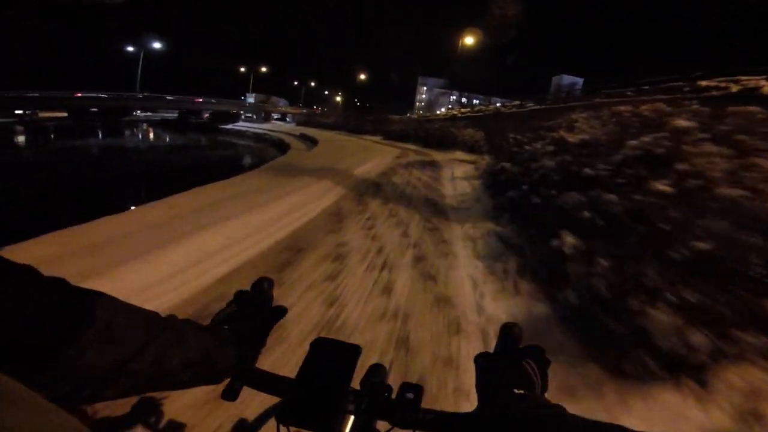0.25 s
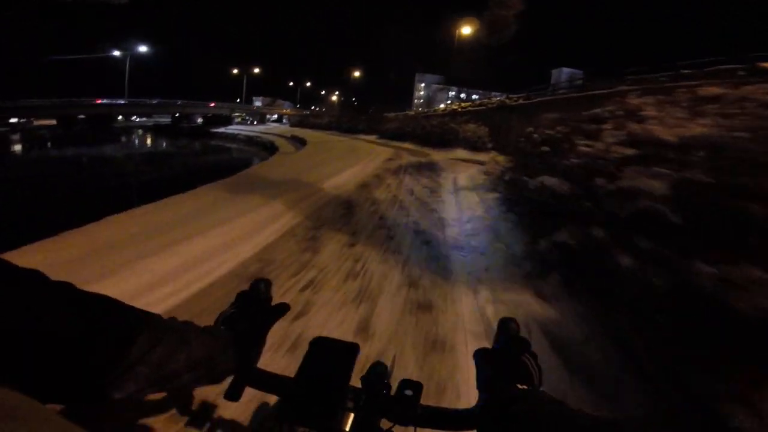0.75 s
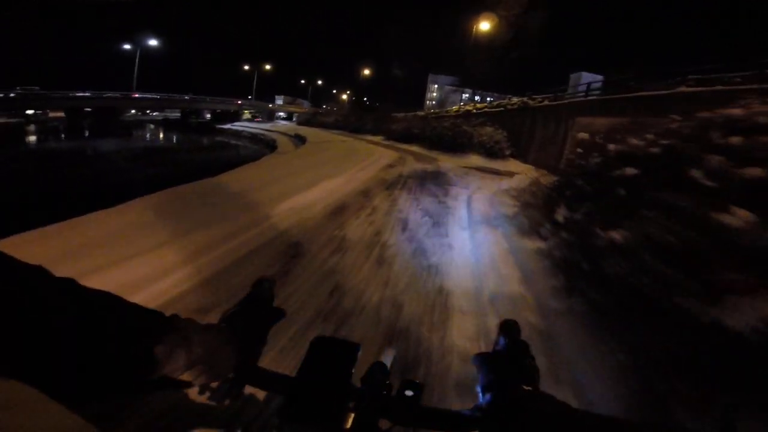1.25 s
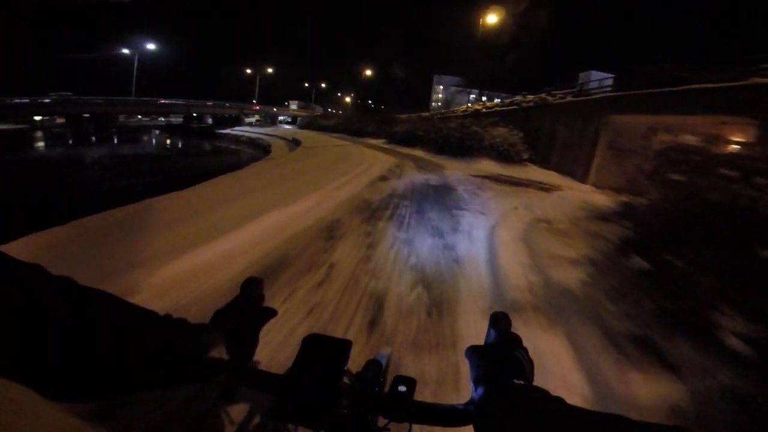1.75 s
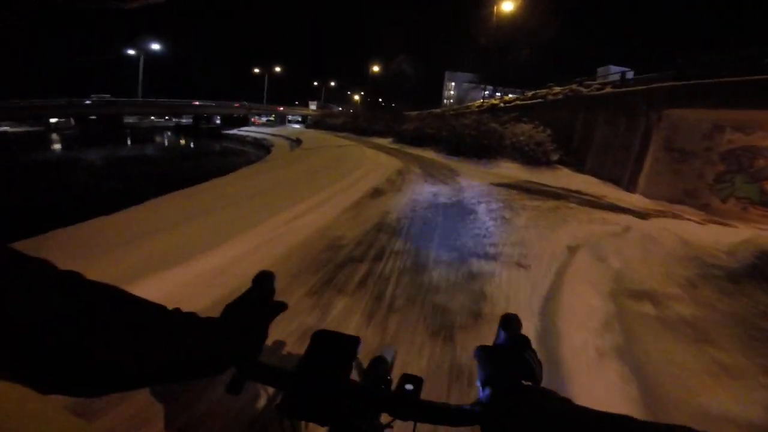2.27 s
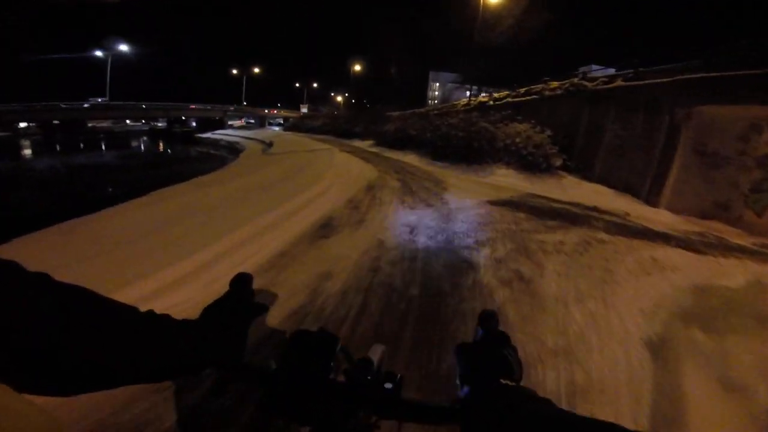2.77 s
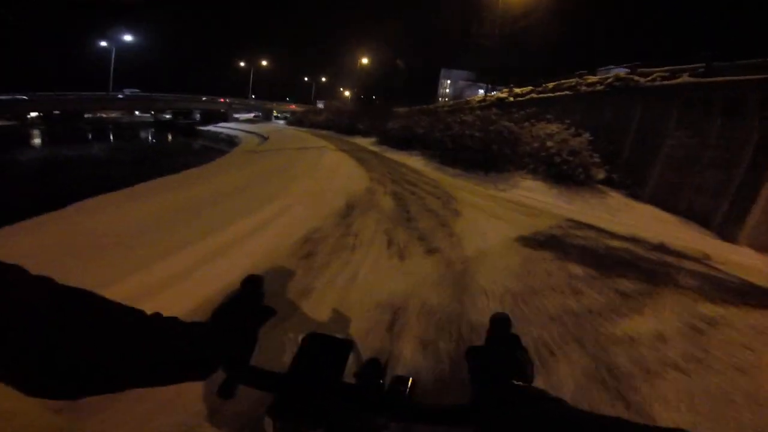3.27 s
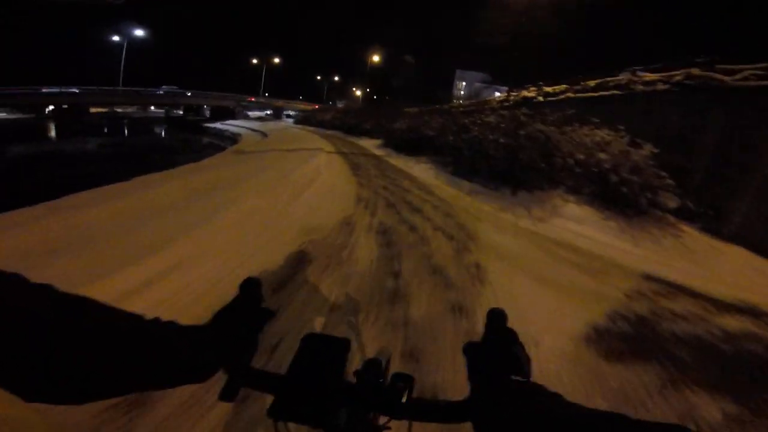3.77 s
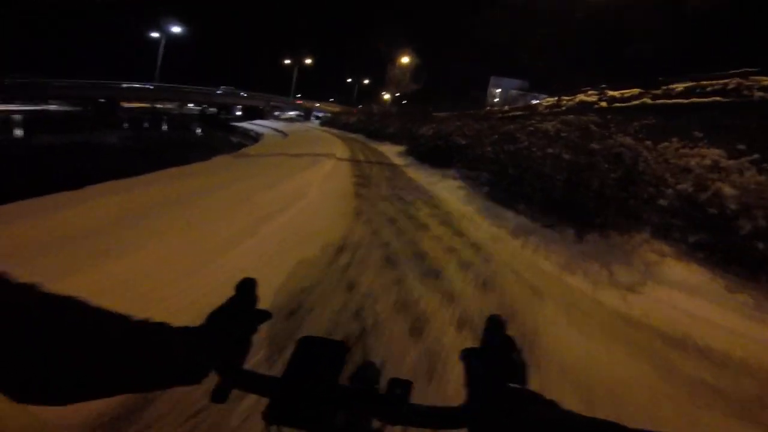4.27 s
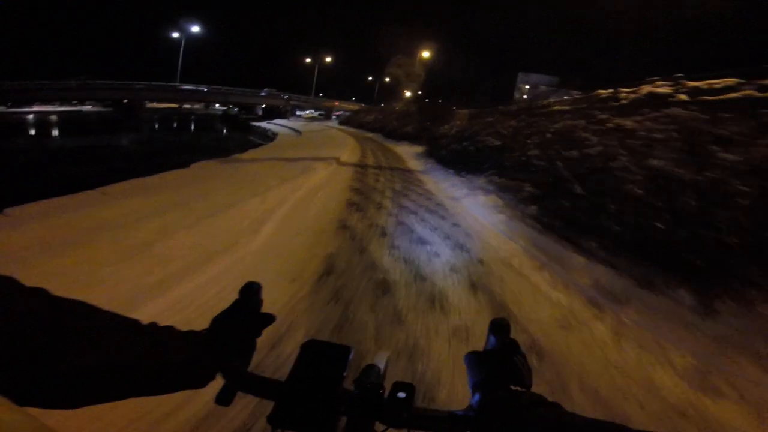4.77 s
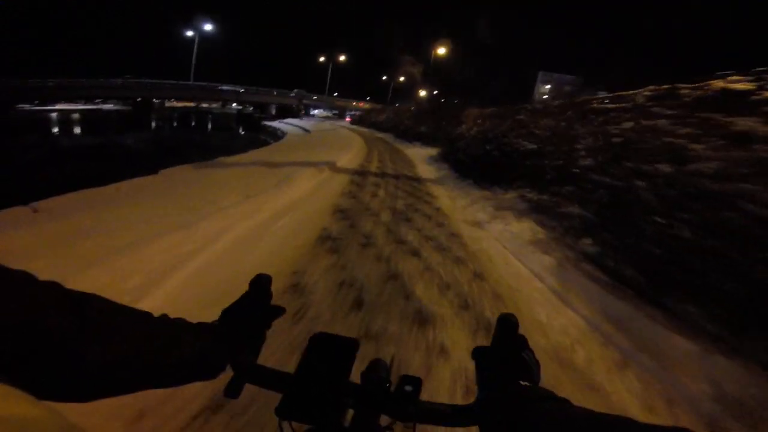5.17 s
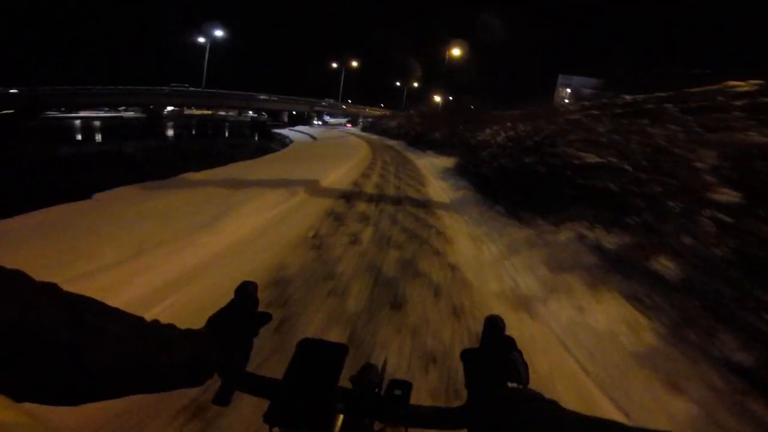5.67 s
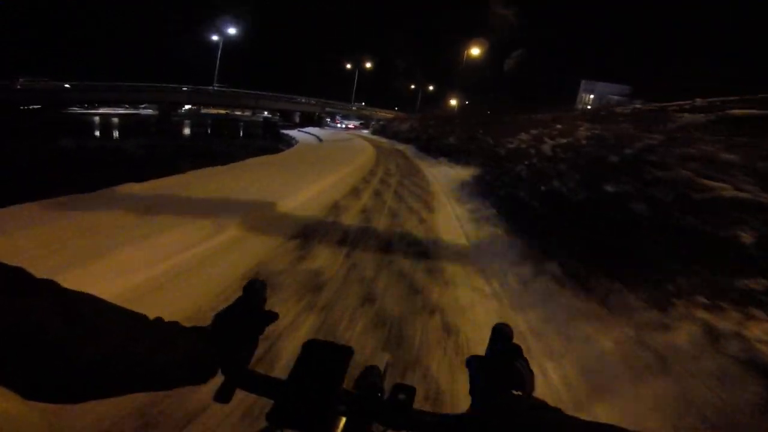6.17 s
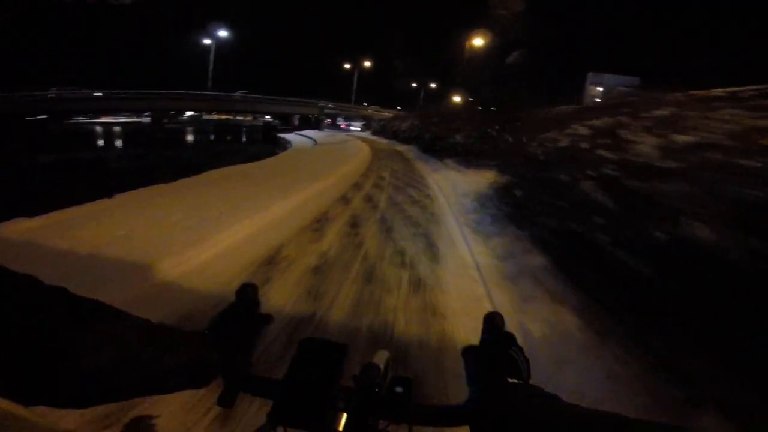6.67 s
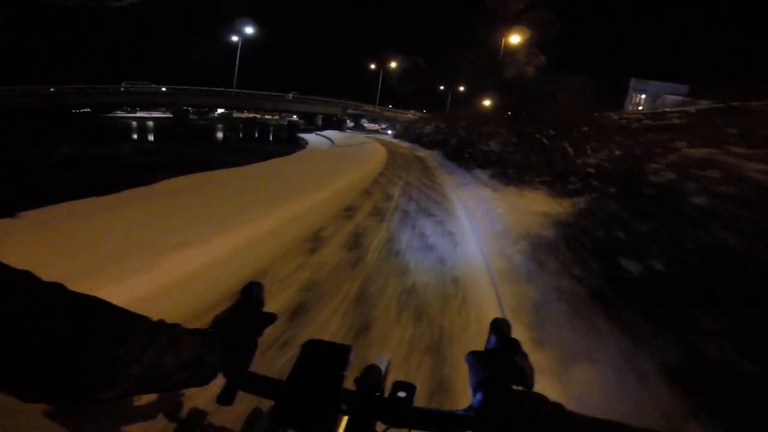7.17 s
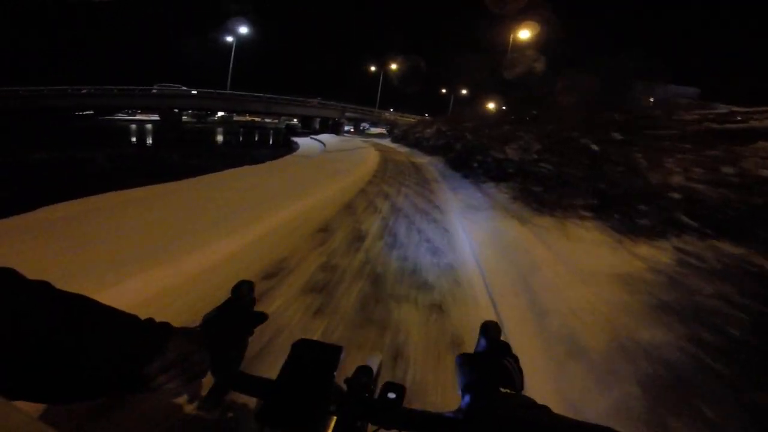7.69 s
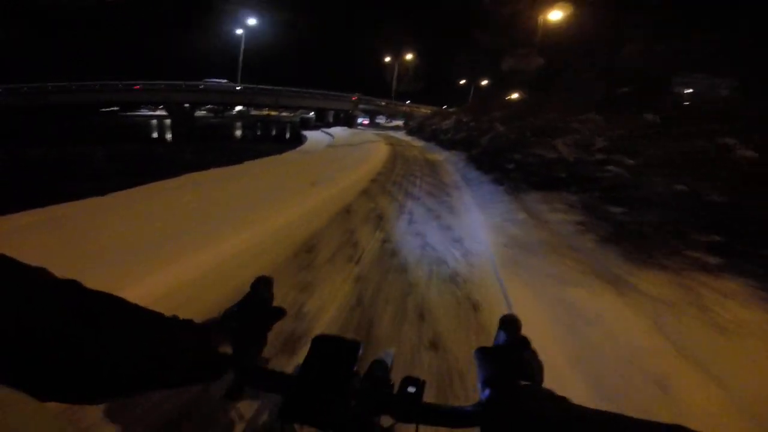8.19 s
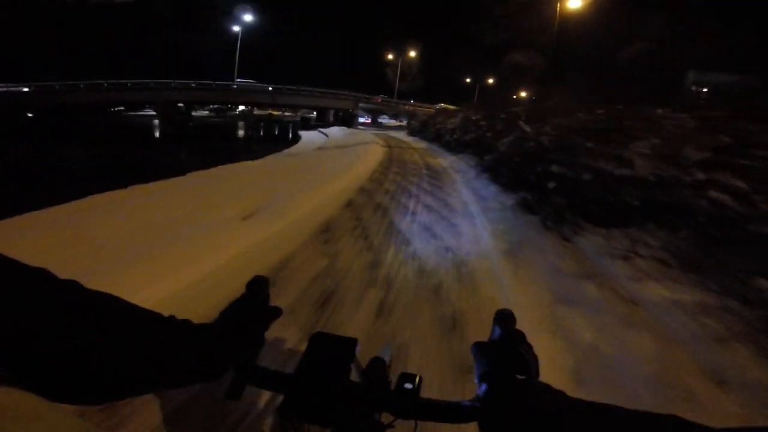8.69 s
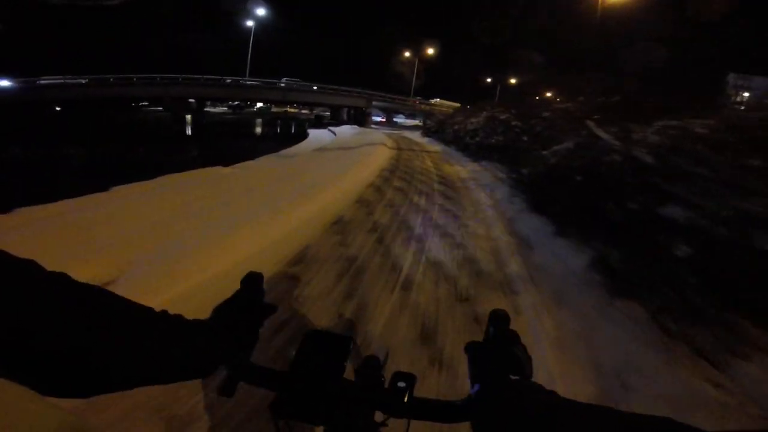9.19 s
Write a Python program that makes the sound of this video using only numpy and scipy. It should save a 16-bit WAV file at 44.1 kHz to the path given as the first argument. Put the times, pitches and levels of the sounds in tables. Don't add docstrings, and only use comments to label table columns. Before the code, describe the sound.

For about nine and a half seconds a bicycle rides without pause over packed snow in the open air, heard very close through a small, hard-cased camera. Deep wind rumble leads, heaving and fluttering irregularly. Underneath runs a softer, dry, grainy tyre hiss with fine crystalline prickle. Early on there are light gusts, ice ticks near 0.1 and 1.0, and crunches around 0.9 and 1.5. Bumps and knocks gather from 1.9 to 2.9, then the heaviest gust hits at 3.0-3.3, briefly overloading the microphone. Another sharp push comes near 4.35. Bright ice snaps stand out around 5.3, with a firm low thud at 5.5. The grind strengthens near 6.8; gusts cluster at 7.6-8.5, with thuds and a ringing rasp near 8.45. Snaps and rolling continue to the end, crisp but slightly holed in the treble.

```python
import sys
import numpy as np
from scipy import signal
from scipy.fft import rfft, irfft, next_fast_len
from scipy.io import wavfile
from scipy.ndimage import uniform_filter1d

SR = 44100
rng = np.random.default_rng(int(sys.argv[2]) if len(sys.argv) > 2 else 0)


def gain_from_decibels(decibels):
    exponent = np.asarray(decibels, float) / 20
    return 10 ** exponent


def pcm_store(signal):
    levels = np.round(np.clip(np.atleast_2d(signal), -1, 1) * 32767)
    wavfile.write(sys.argv[1], SR, levels.astype(np.int16).T)


N = 416304
T = np.arange(N) / SR

# time in seconds, load on the crust in dB, loose powder thrown up in dB over the load.
TYRES = [(0.0, -58, 1), (0.5, -61.5, -2), (1.05, -58.5, -2.5), (1.4, -60.5, -3.5), (1.85, -58.5, -1),
         (2.26, -60.5, -10.5), (2.75, -57.5, -1), (3.4, -59, -4.5), (3.73, -58.5, -9), (4.05, -59, 3.5),
         (5.0, -56.5, -3.5), (5.5, -59, -0.5), (6.07, -58.5, 4), (6.85, -55, -2), (7.44, -59, 1),
         (8.25, -55.5, -1.5), (8.9, -58.5, -6.5), (9.44, -58, 0.5)]
# pitch in Hz, width in Hz, height in dB.
CASE = [(1897, 62, 2), (2528, 50, 5), (2900, 370, 1.5), (3500, 42, 4), (4137, 140, 6.5), (4590, 70, 3.5)]


def evened(x):
    return x / np.sqrt(np.mean(x ** 2) + 1e-20)


def curve(rows, order):
    rows = np.array(rows)
    return np.interp(T, rows[:, 0], rows[:, order])


def colour(x, points, modes=()):
    size = next_fast_len(N)
    hz = np.fft.rfftfreq(size, 1 / SR)
    point_hz, point_db = np.transpose(points)
    shape_db = np.interp(np.log(hz + .1), np.log(point_hz), point_db, right=-160)
    for centre, width, height_db in modes:
        shape_db = shape_db + height_db / (1 + (2 * (hz - centre) / width) ** 2)
    return evened(irfft(rfft(x, size) * gain_from_decibels(shape_db), size)[:N])


def drift(per_s):
    return evened(signal.lfilter(*signal.butter(2, per_s, fs=SR), rng.standard_normal(N)))


def grains(per_s, spread_db):
    size = gain_from_decibels(spread_db * np.minimum(rng.exponential(1, N), 5))
    sign = np.sign(rng.standard_normal(N))
    return evened(size * sign * (rng.random(N) < per_s / SR))


def swells(rows, narrow=4.2):
    out = np.zeros(N)
    for s, db, length in rows:
        near = slice(max(round((s - 2 * length) * SR), 0), round((s + 2 * length) * SR))
        out[near] += gain_from_decibels(db) ** 2 * np.exp(-((T[near] - s) * narrow / length) ** 2)
    return np.sqrt(out)


def steadied(x, size, power):
    swing = abs(uniform_filter1d(uniform_filter1d(x ** 2, size), size)) + 0.037
    return evened(x / swing ** (power / 2))


def patchy(x, depth_db):
    z = signal.stft(x, SR, nperseg=512, noverlap=384)[2]
    field = rng.standard_normal(z.shape[::-1]).T
    field = uniform_filter1d(uniform_filter1d(field, size=6, axis=0), size=30, axis=1)
    z = z * gain_from_decibels(depth_db * evened(field))
    return evened(signal.istft(z, SR, nperseg=512, noverlap=384)[1][:N])


def rings(rows, spread, fall, blur_s):
    out = np.zeros(N)
    chances = rng.uniform(-0.68, 1, (len(rows), 5))
    for (s, db, length, hz), chance in zip(rows, chances):
        tau = max(length - blur_s, .002) / fall
        u = np.arange(round(8 * tau * SR)) / SR / tau
        tone = np.zeros(len(u))
        for place, phase in zip(np.linspace(-1, 1, len(chance)), chance):
            partial_hz = hz * (1 + spread * place)
            tone += gain_from_decibels(-3.5 * abs(place)) * np.sin(2 * np.pi * partial_hz * u * tau + np.pi * phase)
        envelope = np.sqrt(u) * np.exp(1 - u)
        part = out[max(round((s - 1.1 * tau) * SR), 0):][:len(u)]
        part += (gain_from_decibels(db) * evened(tone) * envelope)[:len(part)]
    return out


def wind():
    # time in seconds, airflow over the case in dB, roughness of the air in dB.
    air = [(0.0, -24, -2), (0.6, -25, -1), (1.3, -22, 0), (1.9, -22.5, -2), (2.3, -16.5, -0.5),
           (3.0, -27.5, 0), (3.6, -20, -0.5), (4.2, -25, 0), (4.7, -24, -0.5), (5.1, -20.5, 0),
           (5.7, -23, -1.5), (6.4, -21, -0.5), (7.0, -22.5, -1), (7.8, -24, -2), (8.4, -18.5, -0.5),
           (8.9, -20, -2.5), (9.44, -31.5, -3.5)]
    # time in seconds, level in dB, length in seconds.
    gusts = [(0.08, -15, 0.082), (0.21, -16.5, 0.16), (0.8, -15.5, 0.25), (1.09, -13.5, 0.12),
             (2.11, -16.5, 0.18), (2.38, -18.5, 0.43), (2.7, -15.5, 0.1), (2.815, -13.5, 0.11),
             (2.98, -10, 0.23), (3.11, -15, 0.6), (3.29, -5, 0.11), (3.42, -21, .06), (3.72, -12.5, 0.29),
             (3.89, -15, 0.16), (4.1, -11.5, 0.23), (4.35, -7.5, 0.03), (4.58, -15.5, 0.17),
             (5.26, -29, 0.23), (6.01, -15, 0.35), (6.73, -18.5, 0.079), (6.98, -15, 0.083),
             (7.23, -15.5, .12), (7.41, -16.5, 0.12), (7.57, -10.5, 0.083), (7.73, -19, 0.17),
             (8.02, -9.5, 0.2), (8.13, -12, 0.12), (8.26, -10.5, 0.15), (8.49, -7.5, 0.069),
             (9.3, -15, 0.3)]
    # time in seconds, level in dB.
    flaps = [(0.21, -30.5), (0.47, -40), (0.68, -39), (0.97, -30), (1.1, -28), (1.22, -35.5), (1.44, -35.5),
             (1.68, -34.5), (1.98, -34), (2.3, -42), (2.42, -38), (2.53, -38), (2.65, -30.5), (2.88, -37.5),
             (3.0, -28), (3.12, -39), (3.29, -35), (3.6, -33.5), (3.73, -31.5), (3.96, -33), (4.09, -27.5),
             (4.21, -37.5), (4.33, -29), (4.57, -35), (4.8, -42), (4.92, -40), (5.16, -35), (5.4, -38.5),
             (5.64, -32), (5.76, -34), (5.89, -32.5), (6.13, -30.5), (6.25, -38.5), (6.37, -34), (6.5, -36),
             (6.84, -36), (6.95, -30), (7.08, -31), (7.22, -35), (7.34, -34.5), (7.46, -36.5),
             (7.57, -30.5), (7.69, -28), (7.81, -34.5), (8.03, -31), (8.16, -38), (8.28, -30), (8.41, -37),
             (8.88, -38), (9.0, -31), (9.12, -30), (9.24, -26.5), (9.37, -33.5)]
    # pitch in Hz, level in dB.
    heave_hz_db = [(2, -20), (5, -5.5), (8, -1.5), (14, 0), (24, -3), (35, -10.5), (45, -15), (56, -25.5),
                   (75, -47)]
    # pitch in Hz, level in dB.
    flutter_hz_db = [(30, -16), (39, 9), (50, 9), (62, 0.5), (75, -10), (100, -23), (140, -50),
                     (260, -79.5)]
    # pitch in Hz, level in dB.
    roar_hz_db = [(55, -2), (75, 1.5), (105, -1), (200, -8.5), (330, -15), (700, -22), (1150, -26),
                  (1450, -34.5), (2500, -54.5), (6000, -49.5)]
    usual = gain_from_decibels(-20)

    heave = steadied(colour(rng.standard_normal(N), heave_hz_db), size=2400, power=.75)
    flutter = steadied(colour(rng.standard_normal(N), flutter_hz_db), size=1300, power=.95)
    lumps_db = 1.25 * drift(24) + 0.5 * drift(35) + 0.91 * abs(heave)
    roar = colour(rng.standard_normal(N) * gain_from_decibels(lumps_db), roar_hz_db)

    flow = gain_from_decibels(curve(air, order=1))
    push = np.hypot(flow, swells(gusts))
    steady = gain_from_decibels(-39.5) * (flow / usual) ** 0.38
    flap = np.hypot(steady, swells([(s, db, 0.2) for s, db in flaps]))
    roar_gain = gain_from_decibels(-47 + curve(air, order=2)) * (push / usual) ** 0.28

    slow = signal.sosfiltfilt(signal.butter(5, 43, fs=SR, output="sos"), push * heave)
    return slow + gain_from_decibels(2.7) * flap * flutter + roar_gain * roar


def tyres():
    # pitch in Hz, level in dB.
    grind_hz_db = [(900, -3), (1400, -1), (1750, 6.5), (3500, 2.5), (3900, -1), (5500, -4.5), (6550, -9.5),
                   (8900, -11.5), (10400, -23), (14600, -33), (16000, -31.5)]
    # pitch in Hz, level in dB.
    spray_hz_db = [(2500, -5), (3700, -0.5), (4100, 4.5), (4700, 8), (5200, 3), (5500, -8), (6100, -2.5),
                   (6600, -29.5), (9000, -49.5)]
    # time in seconds, length in seconds, level in dB, sharpness in dB.
    crunches = [(0.54, 0.14, -61, -8), (0.859, 0.1, -54.5, -9), (1.272, 0.031, -63, -8),
                (1.467, 0.031, -59, -7), (1.652, 0.039, -58, -21), (1.75, 0.11, -65.5, -5),
                (2.474, 0.031, -54, -9), (2.878, 0.13, -57, -7), (2.975, 0.069, -54.5, -8),
                (3.08, 0.054, -56, -9), (3.191, 0.027, -64, -1), (3.25, 0.031, -66, 1),
                (3.735, 0.078, -55, -6), (3.898, 0.075, -55.5, -8), (4.284, 0.047, -55.5, -21),
                (4.53, 0.024, -56.5, -11), (4.606, 0.017, -53.5, -22), (5.205, 0.078, -58, -4.5),
                (5.302, 0.02, -54.5, -14), (5.54, 0.037, -57, -19), (5.763, 0.14, -57.5, -15),
                (5.937, 0.093, -58.5, -12), (6.017, 0.045, -56, -8), (6.25, 0.058, -62.5, -1),
                (6.755, 0.09, -52, -10.5), (7.836, 0.11, -58.5, -13), (8.246, 0.11, -59, -11),
                (8.371, 0.046, -54, -10), (8.53, 0.22, -57, -16), (8.876, 0.12, -60, -20)]
    # time in seconds, length in seconds, level in dB.
    crackles = [(0.081, 0.025, -55), (1.53, 0.037, -58), (2.86, 0.1, -55.5), (4.096, 0.03, -55.5),
                (4.328, 0.016, -53), (5.287, 0.022, -60), (7.478, 0.049, -58), (7.584, 0.048, -59),
                (7.837, 0.21, -61.5), (8.194, 0.025, -59), (8.252, 0.11, -65), (8.878, 0.18, -68)]

    crust_db = 0.46 * drift(21) + 0.98 * drift(90)
    pressed = grains(9000, spread_db=0.0) * gain_from_decibels(crust_db + 1.8 * drift(28))
    grind = patchy(colour(pressed, grind_hz_db, CASE), depth_db=1.13)
    thrown = grains(7000, spread_db=4.0) * gain_from_decibels(1.4 * crust_db + 1.7 * drift(32))
    spray = colour(thrown, spray_hz_db, CASE)
    load, powder = gain_from_decibels(curve(TYRES, order=1)), gain_from_decibels(curve(TYRES, order=2) - 2.5)
    rolling = load * (gain_from_decibels(-1.03) * grind + powder * spray)

    coarse = grains(3000, spread_db=2.5)
    crunch = colour(coarse, [(1000, -18), (1600, 7.5), (3300, 9.5), (4200, -12.5), (7000, -30.0)], CASE)
    crackle = colour(coarse, [(2500, -36.5), (3600, 1.5), (4700, 1.0), (5600, -7.5), (7000, -28.5)], CASE)
    fizz = colour(coarse, [(4500, -1.5), (6000, 2), (9000, -4), (10500, -6.5), (16000, -22.5)])
    breaks = swells([(s, db, length) for s, length, db, _ in crunches])
    sharp = swells([(s, db + sharp_db, length) for s, length, db, sharp_db in crunches])
    alone = swells([(s, db, length) for s, length, db in crackles])
    glaze = np.hypot(gain_from_decibels(-6) * breaks, alone)
    return rolling + gain_from_decibels(0.8) * (breaks * crunch + glaze * crackle + sharp * fizz)


def prickle():
    out = np.zeros(N)
    for hz, _, _ in CASE:
        out += signal.lfilter(*signal.iirpeak(hz, hz / 450, fs=SR), grains(45, spread_db=2.5))
    return gain_from_decibels(curve(TYRES, order=1) - 11.5) * evened(out)


def thuds():
    # time in seconds, level in dB, length in seconds, pitch in Hz.
    ruts = [(0.048, -41, 0.02, 110), (0.764, -48, 0.055, 164), (1.936, -36.5, 0.012, 132),
            (2.177, -43, 0.032, 164), (2.398, -39.5, 0.045, 140), (2.436, -45, 0.04, 123),
            (2.802, -40, 0.034, 139), (2.915, -38, 0.012, 166), (3.933, -42.5, 0.023, 170),
            (4.182, -40, 0.045, 148.5), (4.275, -49.5, 0.047, 256.5), (4.581, -54, 0.077, 137.5),
            (4.922, -42, 0.038, 248), (5.469, -34, 0.026, 175), (5.545, -46, 0.042, 156),
            (5.615, -46, 0.058, 126), (5.672, -38, 0.015, 162), (5.878, -51, 0.022, 115),
            (5.94, -45, 0.014, 109), (5.977, -49.5, 0.061, 195), (6.207, -37, 0.023, 116),
            (7.168, -38.5, 0.035, 147), (7.855, -49, 0.055, 159.7), (8.105, -48, 0.032, 178),
            (8.24, -46.5, 0.076, 229.8), (8.896, -42, 0.009, 126), (8.921, -41, 0.073, 98),
            (9.176, -52, 0.06, 105), (9.4, -42, 0.012, 166)]
    return gain_from_decibels(-2.0) * rings(ruts, spread=.3, fall=2.2, blur_s=.008)


def snaps():
    # time in seconds, peak in dB, high modes over low modes in dB, tick in dB.
    ice = [(0.0753, -35, 8, -34), (0.1326, -37, 15, -6), (1.0118, -40, -3, -2), (1.6455, -40, 5, -22),
           (1.7268, -39, 3, -19), (1.801, -43, 1, -17), (2.1642, -42, -13, -31), (2.458, -43, -4, -18),
           (2.6254, -38, 1, -13), (5.2806, -33, 8, -30), (5.331, -29, -2, -10), (5.4317, -37.5, 9, -14),
           (5.5708, -36, 10, -22), (6.19, -34, 19, -20), (6.56, -42, 12, -3), (7.694, -38, 5, -22),
           (7.7907, -34, 9, -24), (8.7012, -34, -5, -11), (8.84, -42, -3, -17), (9.0966, -39, -5, -24),
           (9.234, -30.5, 9, -31), (0.4935, -40, 4, -20), (1.057, -45, -1, -20), (2.33, -38, -8, -18),
           (2.7285, -38, 8, -22), (4.092, -37.5, -1, -12), (4.761, -36, 2, -22), (5.6538, -42, 9, -20),
           (6.1047, -37, 11, -20), (6.261, -40, 6, -20), (6.9708, -37, 2, -20), (7.0107, -40, 0, -20),
           (7.1573, -41, -6, -20), (7.1803, -38, 1, -20), (8.859, -37, 2, -20), (8.899, -35.5, -2, -22),
           (8.9193, -38, 1, -20), (9.2785, -44, -10, -25)]
    out, t = np.zeros(N + 800), np.arange(800) / SR
    decay = gain_from_decibels(-60 * t / .008) + .2 * gain_from_decibels(-60 * t / .03)
    envelope = decay * (1 - np.exp(-t / .0002))
    tick = np.sin(2 * np.pi * 6900 * t) + 1.4 * np.sin(2 * np.pi * 9200 * t)
    tick = tick * gain_from_decibels(-60 * t / 0.0035)
    chances = rng.standard_normal((len(ice), len(CASE)))
    for (s, db, high_db, tick_db), chance in zip(ice, chances):
        ring = np.zeros(800)
        for (hz, _, _), c in zip(CASE, chance):
            mode_db = 2.0 * c - 2.2 * (4000 < hz < 4400) + (high_db if hz > 3300 else 0)
            ring += gain_from_decibels(mode_db) * np.sin(2 * np.pi * hz * t + c)
        ring = ring * envelope
        out[round(s * SR):][:800] += gain_from_decibels(db - 3.5) * (ring / abs(ring).max() + gain_from_decibels(tick_db - 7.0) * tick)
    return out[:N]


def singing():
    # time in seconds, length in seconds, level in dB, pitch in Hz.
    sung = [(0.67, 0.4, -66, 3500), (1.23, 0.35, -69, 2950), (1.227, 0.26, -61, 1880),
            (1.54, 0.36, -72, 2950), (2.228, 0.21, -61, 1880), (2.328, 0.27, -74, 2510),
            (2.533, 0.4, -66, 4160), (2.545, 0.27, -63, 1900), (2.555, 0.18, -64, 4780),
            (3.12, 0.22, -60, 4100), (3.46, 0.22, -71, 2550), (3.478, 0.13, -62, 1890),
            (3.96, 0.33, -64.5, 4620), (4.22, 0.42, -57.5, 1870), (4.37, 0.26, -65, 4080),
            (4.71, 0.2, -71, 4240), (4.75, 0.27, -69, 3500), (4.76, 0.4, -64, 2920),
            (4.782, 0.29, -62, 4540), (4.79, 0.4, -62, 2600), (5.54, 0.36, -66, 1900),
            (5.64, 0.24, -61, 4050), (5.64, 0.36, -63, 3500), (5.89, 0.39, -62, 2550),
            (5.99, 0.4, -59, 1850), (6.45, 0.29, -59, 3500), (6.91, 0.47, -61, 3500),
            (7.03, 0.13, -64, 3500), (7.05, 0.37, -73, 4620), (7.16, 0.28, -66, 1900),
            (7.167, 0.11, -66, 3500), (7.18, 0.16, -65, 2970), (7.29, 0.12, -66, 1900),
            (7.295, 0.12, -60, 3500), (7.3, 0.17, -61, 2600), (7.412, 0.24, -63, 4160),
            (7.96, 0.13, -66, 3500), (8.177, 0.35, -62, 1900), (8.45, 0.12, -53, 3500),
            (8.768, 0.49, -59, 3500), (8.83, 0.4, -65.5, 2950), (8.9, 0.51, -64, 2570),
            (8.94, 0.07, -64, 3500), (9.13, 0.21, -58, 3500), (9.3, 0.2, -62, 3500)]
    out, fine = np.zeros(N), grains(2500, spread_db=2.5)
    for hz in {row[3] for row in sung}:
        ring = signal.lfilter(*signal.iirpeak(hz, hz / 210, fs=SR), fine)
        rows = [(s, db - 4.5, length) for s, length, db, f in sung if f == hz]
        out += evened(ring) * swells(rows, narrow=4.6)
    return out


def knocks():
    # time in seconds, level in dB, length in seconds, pitch in Hz.
    fittings = [(0.724, -53, 0.016, 900), (1.445, -43, 0.012, 780), (2.1655, -44.5, 0.012, 1080),
                (2.209, -55, 0.026, 866), (2.367, -53, 0.013, 807), (2.536, -56, 0.021, 1200),
                (2.608, -51, 0.014, 1140), (2.833, -56.5, 0.025, 780), (3.478, -46.5, 0.0095, 1184),
                (3.567, -52, 0.014, 915), (4.197, -55.5, 0.037, 1054), (4.287, -54.5, 0.039, 914),
                (4.577, -58.5, 0.035, 1006), (4.813, -58, 0.018, 1035), (4.907, -46, 0.0057, 1036),
                (4.946, -63.5, 0.065, 1000), (5.11, -60.5, 0.039, 970), (5.307, -60, 0.038, 915),
                (5.379, -59, 0.027, 880), (5.57, -52.5, 0.014, 1020), (6.29, -60, 0.019, 1080),
                (7.579, -67, 0.022, 794), (8.242, -49.5, 0.028, 1024), (8.898, -63, 0.036, 880)]
    return gain_from_decibels(-1.0) * rings(fittings, spread=0.17, fall=1.8, blur_s=0.00977)


def scene():
    ground = tyres() + prickle() + snaps() + singing()
    return (wind() + ground + thuds() + knocks())[None]


def thin_treble(x):
    # pitch in Hz, share of moments.
    survives = [(5600, 1), (6500, .9), (9300, .92), (9700, .72), (10400, .68), (10500, .93), (12800, .93)]
    # start in seconds, length in seconds.
    dull = [(0.26, 0.04), (0.57, 0.03), (0.7, 0.05), (0.91, 0.07), (1.21, 0.05), (1.58, 0.04), (1.98, 0.04),
            (2.07, 0.04), (3.92, 0.05), (4.15, 0.03), (4.61, 0.03), (4.97, 0.03), (6.0, 0.04), (6.18, 0.05),
            (6.58, 0.03), (6.98, 0.04), (7.25, 0.03), (7.44, 0.05), (7.74, 0.03), (7.78, 0.05),
            (7.94, 0.05), (8.49, 0.04), (8.6, 0.04), (8.96, 0.04), (9.11, 0.04), (9.26, 0.04)]
    hz, t, z = signal.stft(x, SR, nperseg=256, noverlap=128)
    frame = np.arange(len(t))
    cell = frame // 2
    band = rng.random((len(t), 40))[frame // 8][:, (hz // 650).astype(int)].T
    speck = rng.random((len(t), 65))[cell][:, np.arange(len(hz)) // 3].T
    treble_db = 10 * np.log10((abs(z[hz > 9000]) ** 2).sum(0) + 1e-20)
    mood = uniform_filter1d(rng.standard_normal(len(t)), size=8)[cell] * 2.5
    mood = mood + .15 * (treble_db - uniform_filter1d(treble_db, size=120))

    hz = hz[:, None]
    uneven = gain_from_decibels(6.9 * (speck - .5) * (hz > 5600))
    kept = np.where(band < np.interp(hz, *np.transpose(survives)), uneven, gain_from_decibels(-11))
    gap_share = np.interp(hz, [5500, 6500, 12800], [0, .16, .2])
    gaps = rng.random((len(t), len(hz)))[frame // 5].T < gap_share
    kept = kept * np.where(gaps, gain_from_decibels(-17.5), 1)
    speck_share = np.interp(hz, [12900, 13600, 15000, 15300], [.1, .25, .3, 0])
    specks = (mood > .05) * (speck < speck_share)
    kept = np.where(hz > 12900, np.where(specks, gain_from_decibels(11.0), gain_from_decibels(-24)), kept) * (hz < 15750)
    buzz = gain_from_decibels(-112) * (mood < -.3) * speck[0] * (hz > 12500) * (hz < 15750)
    z = z * kept + buzz
    cut = sum((t > s) & (t < s + length) for s, length in dull) > 0
    z = z * np.where(cut & (hz > 11400), gain_from_decibels(-28), 1)
    return signal.istft(z, SR, nperseg=256, noverlap=128)[1][:N]


def band_limit(x):
    return signal.sosfilt(signal.butter(12, 16310, fs=SR, output="sos"), x)


def record(dry):
    # time in seconds, size of the step.
    jumps = [
        (2.965, -0.07),
        (3.265, -0.045),
        (3.2850, 0.16),
    ]
    # pitch in Hz, level in dB.
    whine = [(7000, -103), (8000, -104), (9000, -103), (12000, -104), (14508, -105)]
    start, size = np.array(jumps)[:, :1], np.array(jumps)[:, 1:]
    since = np.maximum(T - start, 0)
    steps = (size * (1 - np.exp(-since / 0.00057)) * np.exp(-since / 0.015)).sum(0)
    tones = sum(gain_from_decibels(db) * np.sin(2 * np.pi * hz * T) for hz, db in whine)
    hiss = gain_from_decibels(-77.5) * rng.standard_normal(N)
    taken = .9 * np.tanh(dry[0] / .9) + steps + tones + hiss
    taken = taken * np.minimum(T / .002, 1)
    mix = thin_treble(taken)[None]
    return band_limit(mix)


dry = scene()
out = record(dry)
pcm_store(out)
```